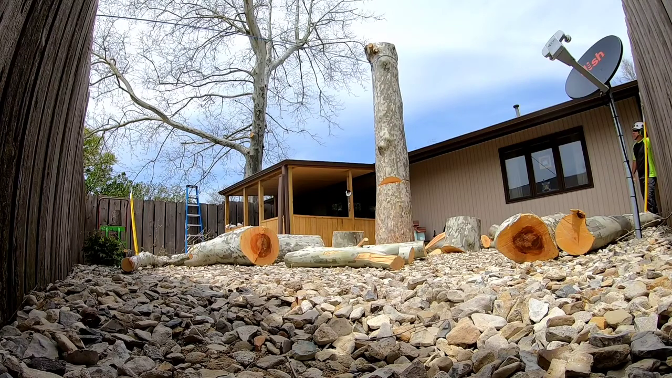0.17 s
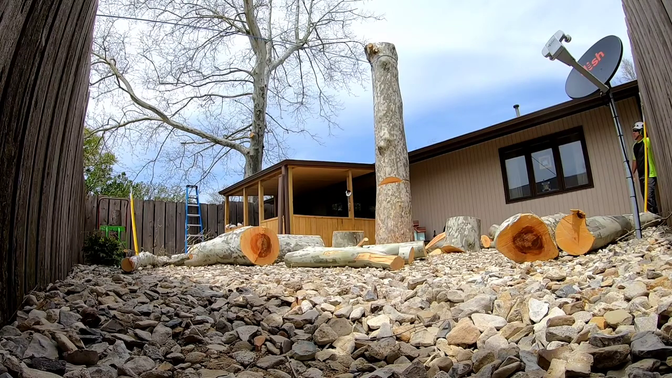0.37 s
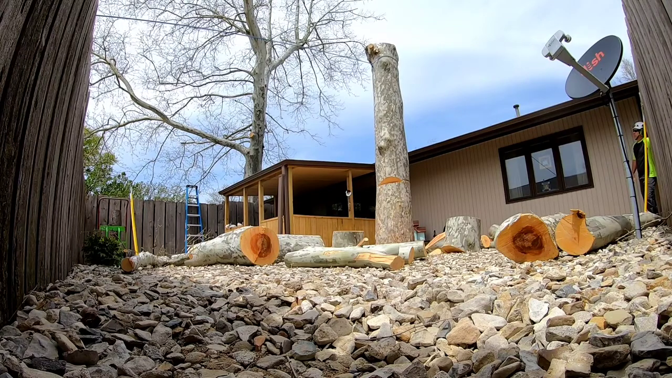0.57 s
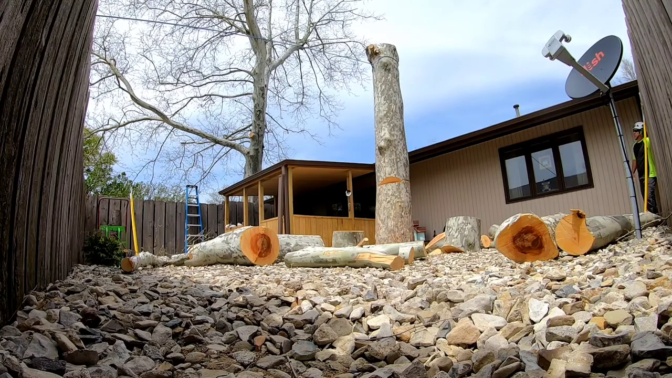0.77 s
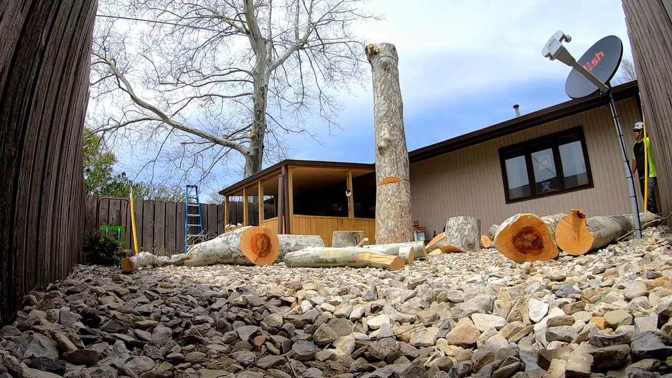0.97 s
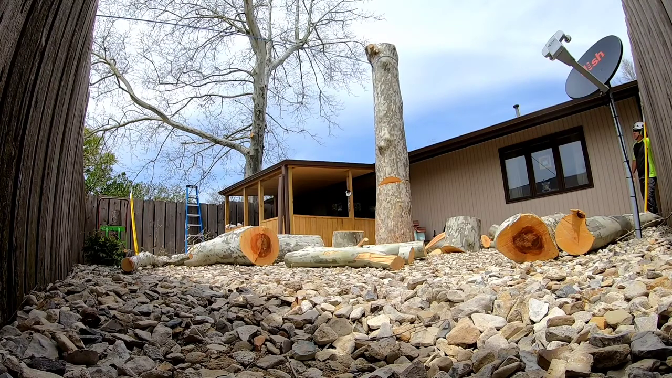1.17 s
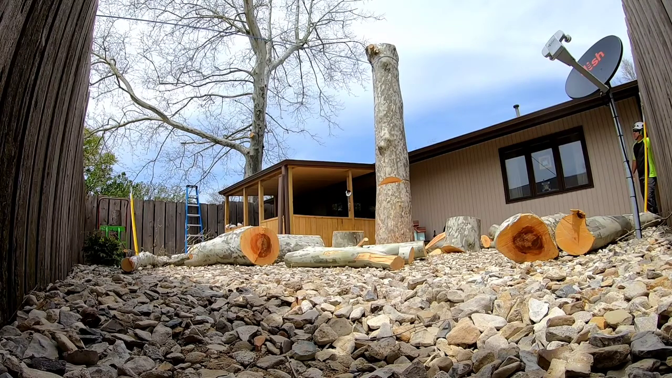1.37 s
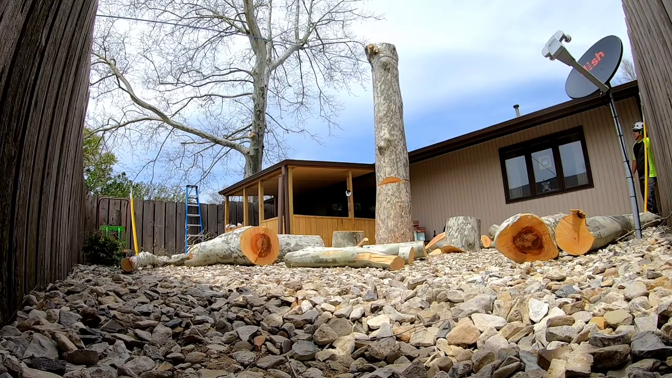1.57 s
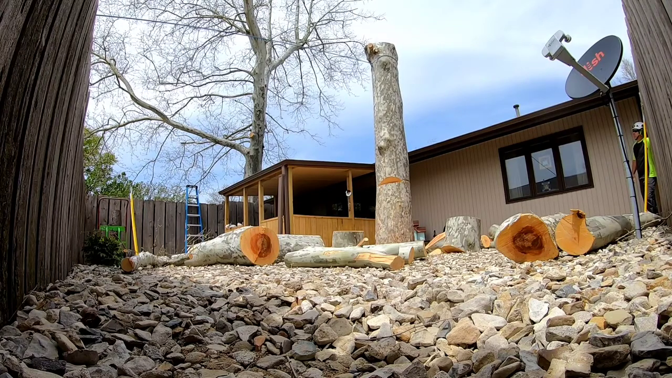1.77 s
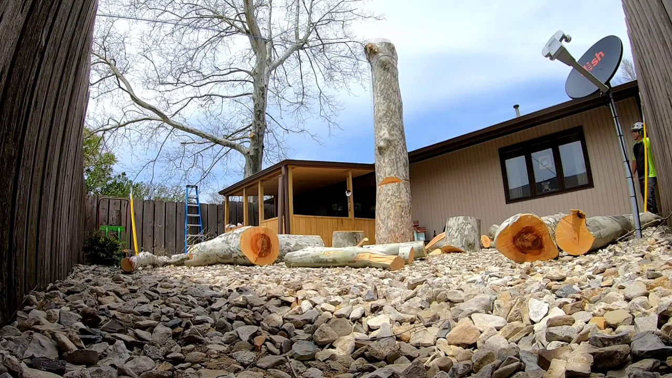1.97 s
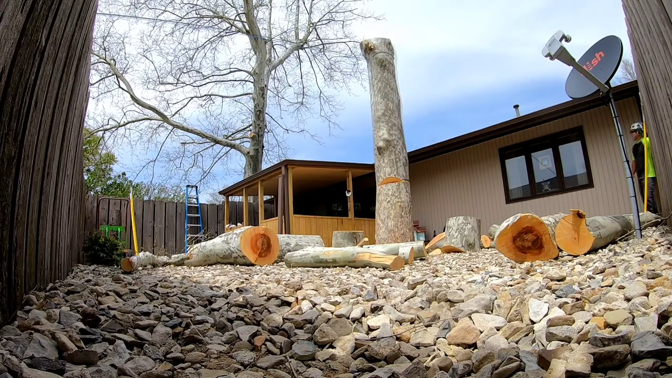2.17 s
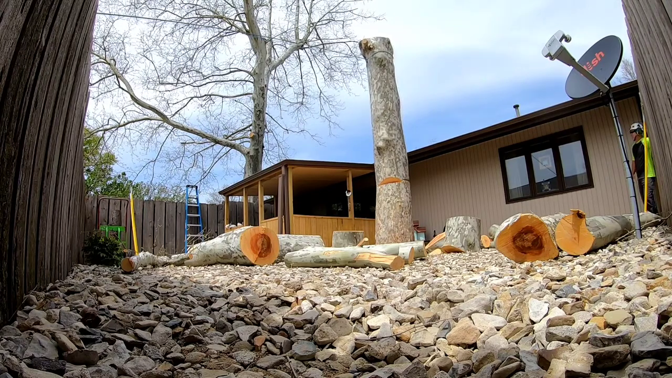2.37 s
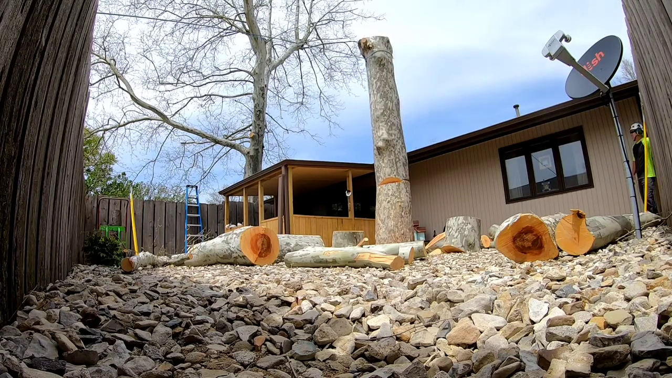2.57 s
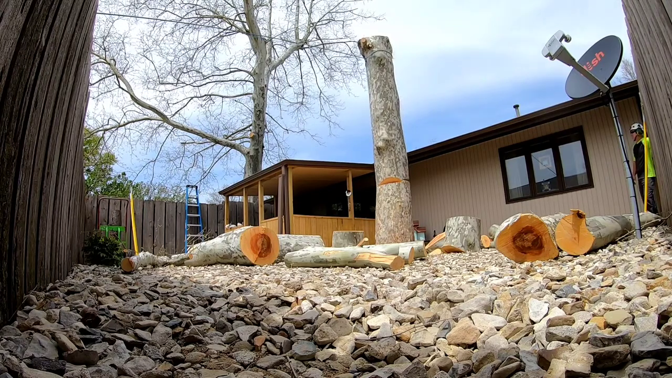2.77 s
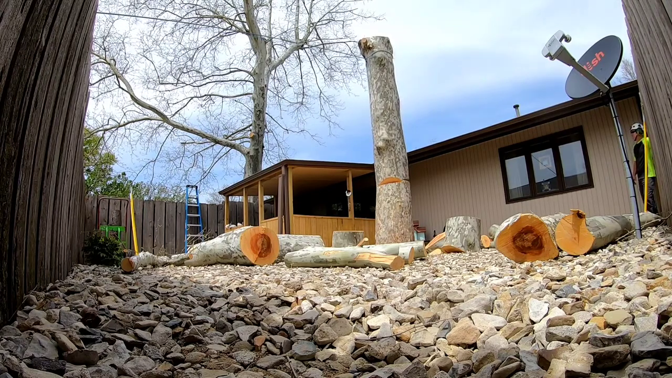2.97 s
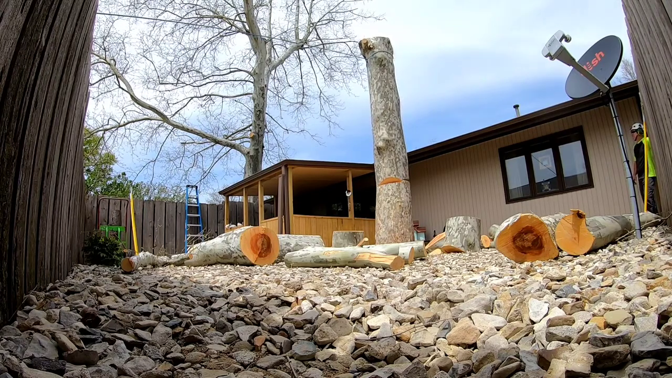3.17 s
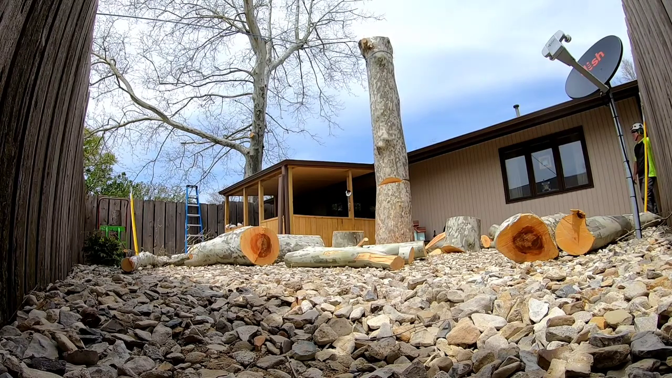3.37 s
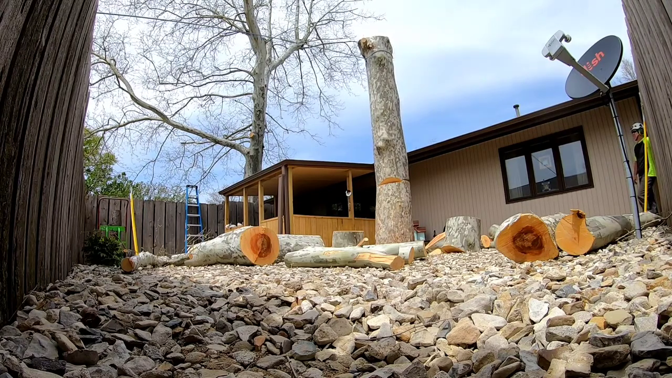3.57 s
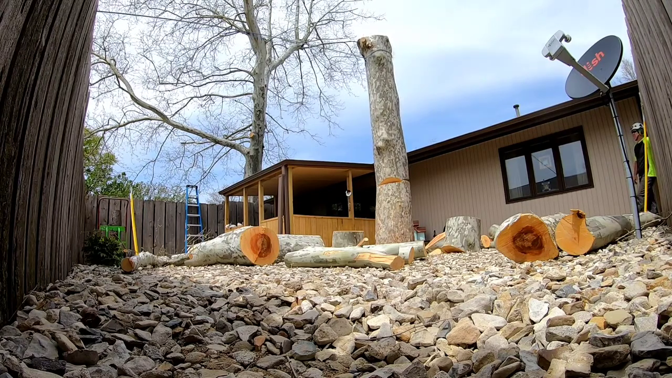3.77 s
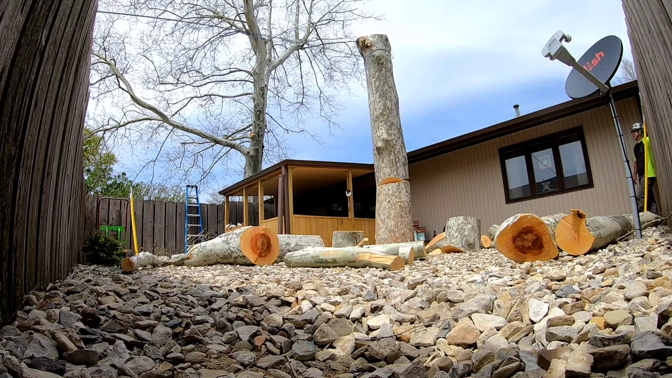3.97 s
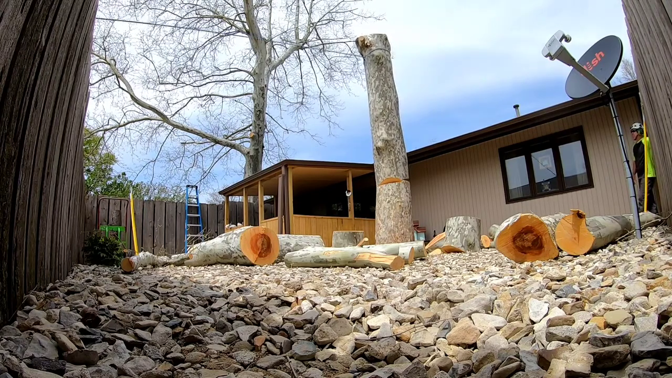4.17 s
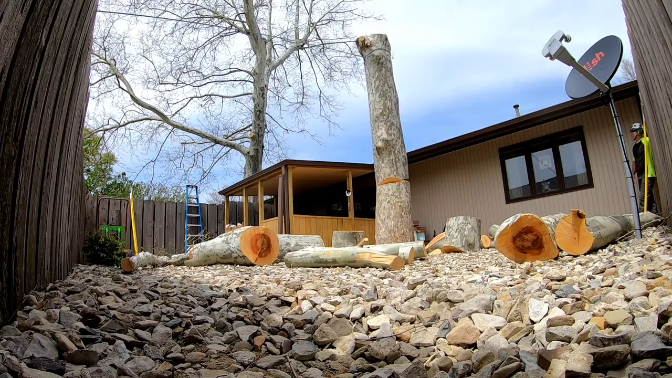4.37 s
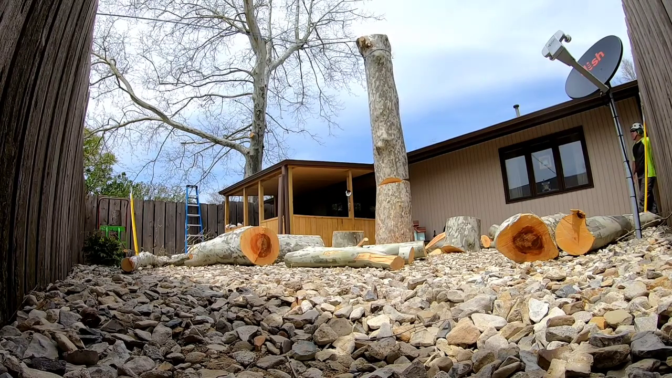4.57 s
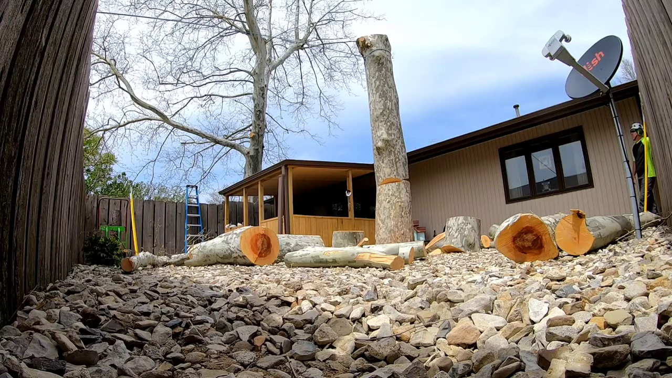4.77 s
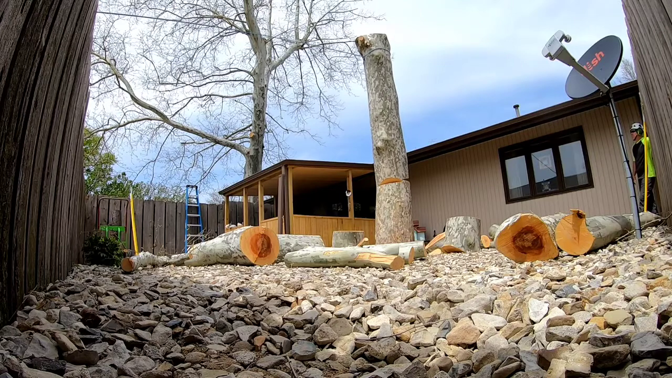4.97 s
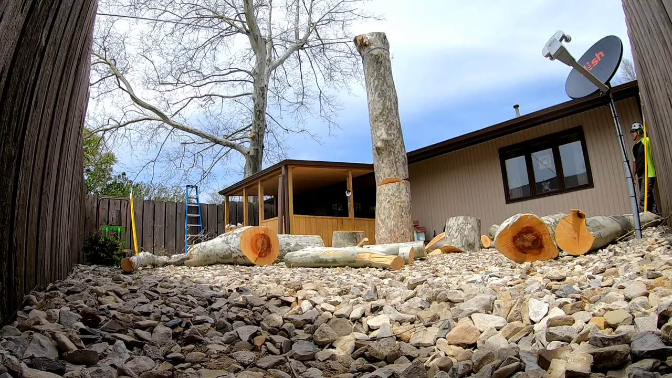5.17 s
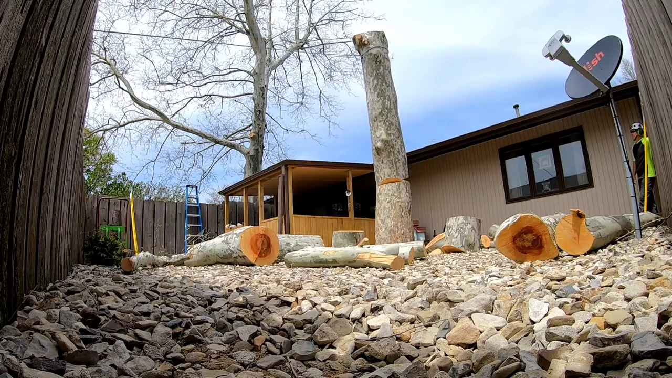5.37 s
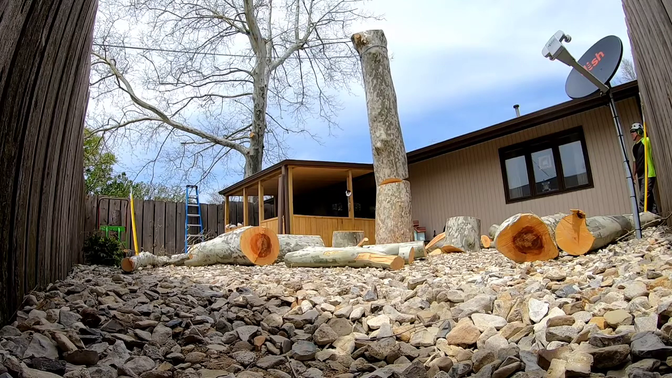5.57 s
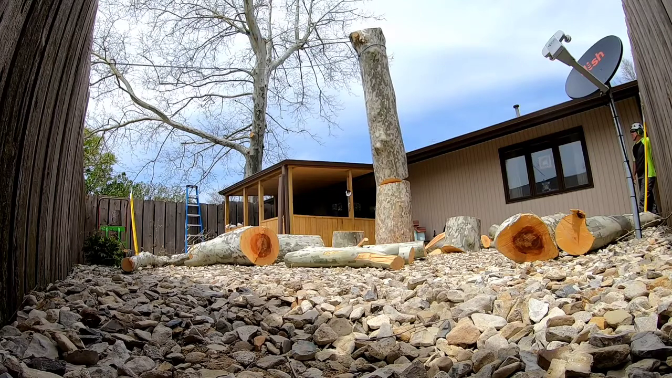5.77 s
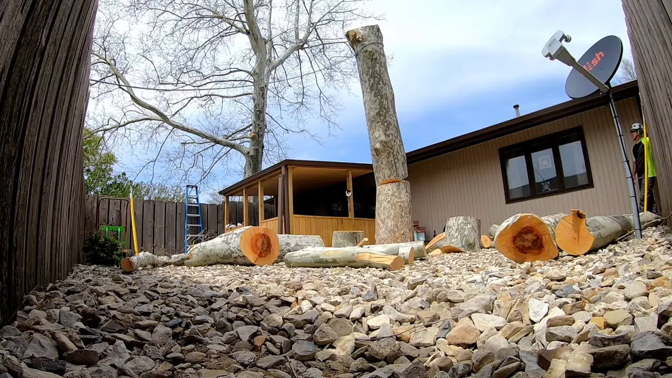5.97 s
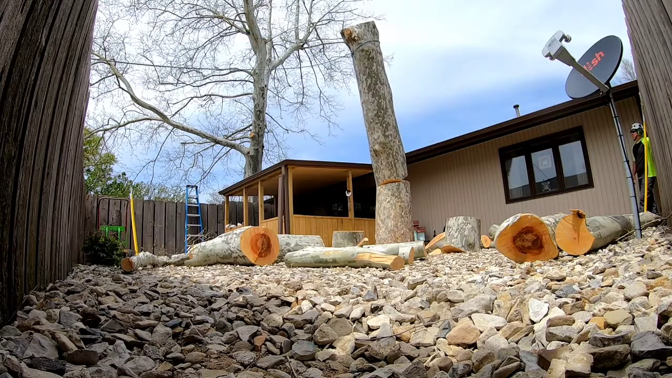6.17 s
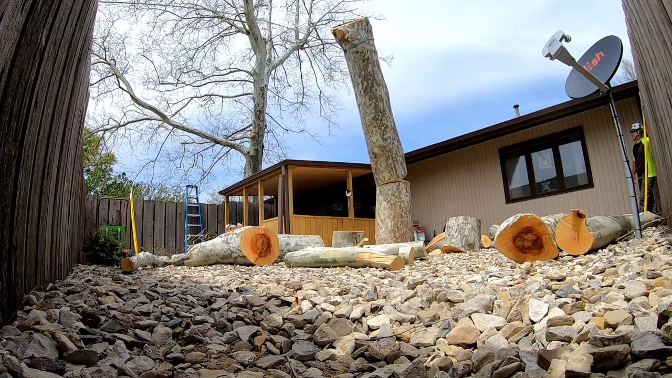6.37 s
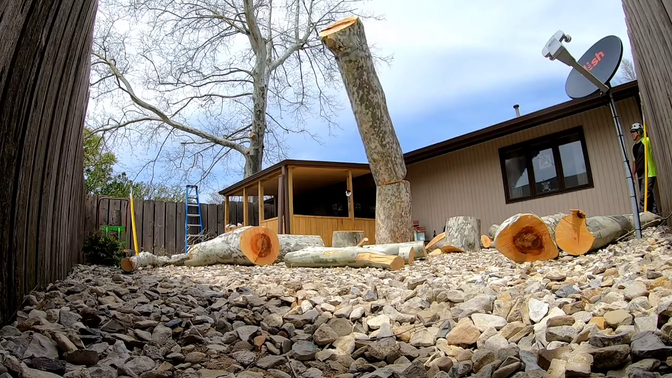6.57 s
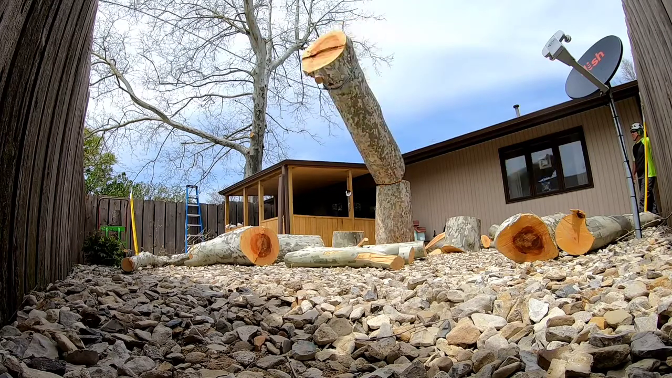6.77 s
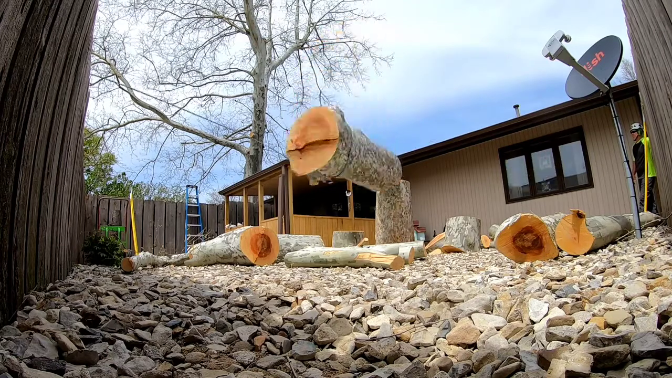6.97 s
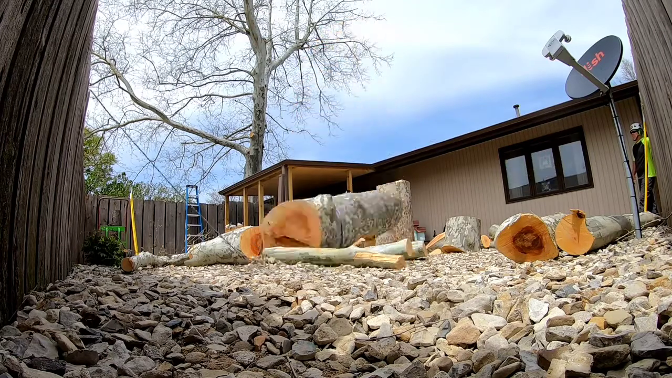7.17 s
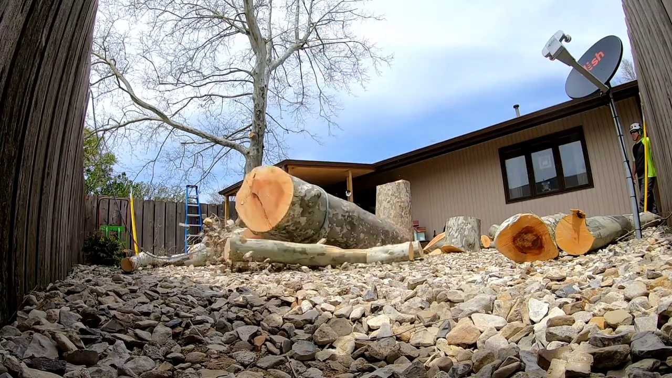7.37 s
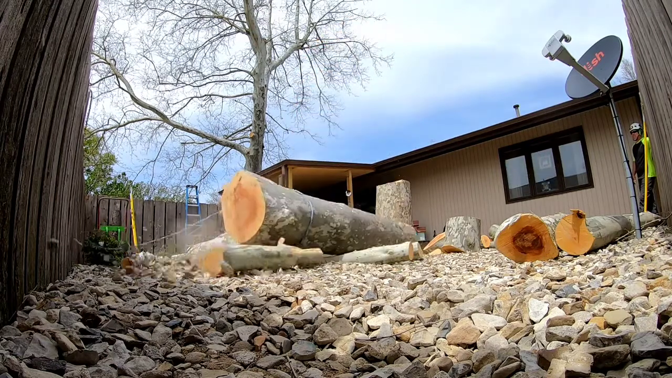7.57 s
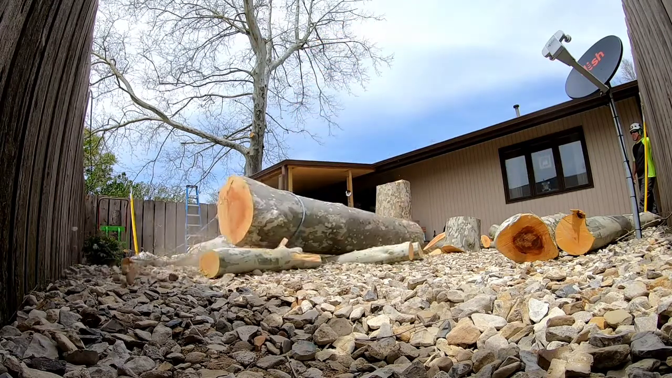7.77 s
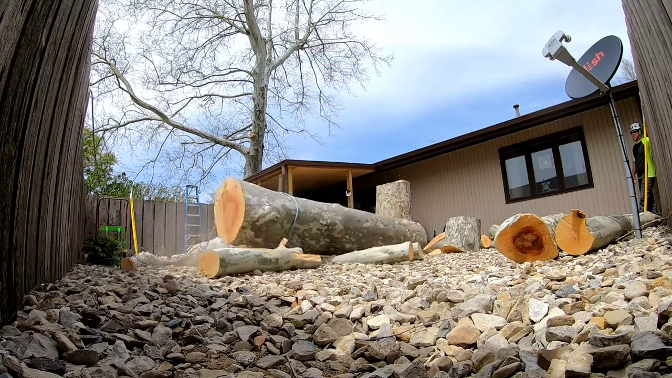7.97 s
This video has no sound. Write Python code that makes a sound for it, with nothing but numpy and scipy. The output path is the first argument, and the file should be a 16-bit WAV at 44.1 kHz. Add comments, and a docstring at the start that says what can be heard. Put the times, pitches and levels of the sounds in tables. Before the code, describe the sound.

A gravel yard between a house and a wooden fence, heard in stereo from near the ground. At first a car's tyre roar fades into low town rumble, with wind buffeting the microphone that slowly freshens; tiny ticks come at 0.9 s and a faint harsh bird repeats notes from 1.2 to 1.9 s. Around 2.45 s wood bursts into sharp snaps and dense tearing crackle until 3 s. After a lull, a second burst runs from 3.7 to 4.3 s. A thin, very faint bird whistle falls at 4.9 s; a third, more scattered and brighter burst covers 5.05-6 s. A low woody groan swells near 6.15 s, with rips at 6.5 and 6.7 s and a hollow thump. At 7.2 s the trunk lands in booming, ringing thuds with a gravel crunch; stones patter and chink, another knock hits at 7.7 s, and loose logs clatter until 8 s. Echoes are short.

```python
"""A gravel yard, heard low by a wooden fence: a tall notched tree trunk is pulled over.
Hinge fibres crack in three main bursts (filtered slip pulses) and tear through (dense random crackle).
The trunk lands with ringing bending modes and a thud, sprays gravel and knocks loose logs about.
House and fence echo it through a decaying noise tail. Shaped noise makes a car fading away, the breeze
and a bird's notes; a swept sine makes one bird whistle; low grainy surges sound like wind gusts."""
import sys
import numpy as np
from scipy import signal
from scipy.fft import rfft, irfft, next_fast_len
from scipy.io import wavfile

SR = 44100
rng = np.random.default_rng(int(sys.argv[2]) if len(sys.argv) > 2 else 0)


def put_to_file(sound):
    """Save the sound as 16-bit audio at rate SR, in the file named by the first command-line argument."""
    columns = np.atleast_2d(sound).T  # one column per channel
    safe = np.clip(columns, -1, 1)
    whole_steps = np.round(safe * 32767)
    wavfile.write(sys.argv[1], SR, whole_steps.astype(np.int16))


N = 353108
TIME = np.arange(N) / SR  # s

# Loudest fibres snapping. Each row: start in seconds, relative level in dB, body gain at 1500 Hz in dB.
FIBRE_SNAPS = [(0.8747, -54.5, 4), (0.926, -57, -8), (2.25, -48.5, -20), (2.443, -34, -18),
               (2.4602, -24, -8), (2.4664, -26.5, -17), (2.5339, -25, 1), (2.5458, -25, -20),
               (2.572, -20, 3.5), (2.584, -30.5, 8), (2.6025, -22.5, 0), (2.6139, -23.5, 0),
               (2.635, -21.5, -13), (2.6933, -24.5, -16), (2.7501, -26.5, 6), (2.7577, -24, 1.5),
               (2.8194, -25, 2), (2.831, -28, 2), (2.8578, -30, 2), (2.8997, -27, -17), (2.941, -35.5, -18),
               (2.9736, -24.5, 0), (2.9862, -32.5, 1), (3.1517, -51.5, -10), (3.195, -51, -10),
               (3.238, -57, -12), (3.3067, -53, -5), (3.55, -50, 7), (3.7083, -28.5, 1), (3.7765, -45, 2),
               (3.8163, -39, -8), (3.839, -31, -12), (3.8858, -32, -6), (3.899, -21, 0),
               (3.9476, -26.5, -9), (3.965, -25, 4), (4.004, -19.5, -8), (4.0208, -22, -16),
               (4.0493, -22.5, -6), (4.18, -26.5, 8), (4.2192, -24.5, 7), (4.2305, -24.5, -8),
               (4.27, -31, -18), (4.2994, -27.5, 3.5), (4.5722, -52, -5), (4.7991, -43.5, -13),
               (5.0531, -31.5, -11), (5.1053, -33, -2), (5.1755, -24, -13), (5.1893, -27.5, -12),
               (5.308, -23.5, 2), (5.3202, -32.5, 21), (5.3542, -30, 4), (5.4264, -25, -5),
               (5.5194, -28.5, -3.5), (5.565, -28, 6.5), (5.6922, -30, -11), (5.7546, -27, -3),
               (5.9929, -32.5, 1), (6.0764, -43, -8), (6.4503, -43.5, -12), (6.4857, -30.5, -12),
               (6.706, -24, -8), (6.9702, -43, -20), (7.0715, -48.5, -18), (7.2016, -24.5, 6)]
# Colour of splitting wood. Each row: frequency in Hz, gain in dB.
SPLIT_SPECTRUM = [(200, -3), (700, -15), (1000, -19.5), (1350, 3), (1750, -9.5), (2300, 5), (3050, -6),
                  (3650, 7), (4200, -3.5), (4800, 4.5), (6300, -2.5), (7800, -13), (9300, 0.5),
                  (12000, -28.5), (15500, -29.5)]
# Colour of tearing fibres. Each row: frequency in Hz, gain in dB.
TEAR_SPECTRUM = [(350, -5), (600, -40.5), (890, -7), (1170, -15.5), (1340, -2), (1600, -8.5), (1990, -3.5),
                 (2250, -4.5), (3200, -3.5), (4810, 1.5), (7740, -11), (9240, -11), (14500, -36),
                 (15500, -43.5)]


def undb(db):
    """Decibels to amplitude gain."""
    return 10 ** (np.asarray(db) / 20)


def unit(x):
    """Scale to rms 1."""
    return x / np.sqrt(np.mean(x ** 2))


def at_hz(points, f):
    """Interpolate (Hz, value) points on a log-frequency axis."""
    hz, value = np.transpose(points)
    return np.interp(np.log(f + 1), np.log(hz), value)


def fade(t, t60_s):
    """Exponential free decay, 60 dB in t60_s."""
    return np.exp(-np.log(1000) * t / t60_s)


def since(start_s):
    """Seconds gone by since start_s, zero before."""
    return np.maximum(TIME - start_s, 0)


def wander(points_per_s):
    """Line through 400 random normal points; stays at the last one once they run out."""
    return np.interp(TIME * points_per_s, np.arange(400), rng.standard_normal(400))


def add(out, start_s, x):
    """Mix x into out from start_s on."""
    i = int(start_s * SR)
    out[..., i:i + x.shape[-1]] += x[..., :N - i]


def colour(x, *spectra):
    """Causal minimum-phase filter whose gain is the sum of the (Hz, dB) spectra."""
    n = 2 * next_fast_len(x.shape[-1] // 2 + 1024)
    f = np.arange(n // 2 + 1) * SR / n
    gain_db = sum(at_hz(points, f) for points in spectra)
    # folding the cepstrum gives the minimum phase
    cepstrum = irfft(np.log(undb(gain_db)))
    cepstrum[1:n // 2] *= 2
    cepstrum[n // 2 + 1:] = 0
    response = np.exp(rfft(cepstrum))
    return irfft(rfft(x, n) * response)[..., :x.shape[-1]]


def spread(pair):
    """Turn two unrelated signals into left and right, alike in the bass."""
    # Each row: frequency in Hz, likeness of left and right from 0 to 1.
    likeness = [(25, 1), (80, 1), (280, 1), (600, 0.75), (1200, 0.48), (2500, 0.9), (4500, 0.75),
                (7000, 0.05)]
    n = 2 * next_fast_len(pair.shape[-1] // 2 + 1)
    mid, side = rfft(pair, n)
    alike = np.clip(at_hz(likeness, np.arange(len(mid)) * SR / n), 0, 1)
    mid = mid * np.sqrt((1 + alike) / 2)
    side = side * np.sqrt((1 - alike) / 2)
    return irfft(np.array([mid + side, mid - side]))[:, :pair.shape[-1]]


def noise(n):
    """Scattered stereo noise."""
    return spread(rng.standard_normal((2, n)))


def clicks(per_s, scatter_db):
    """Random clicks of unequal size and either sign, rms 1."""
    out, count = np.zeros(N), int(per_s * N / SR)
    when, rarity, sign = rng.random((40000, 3))[:count].T
    size = undb(-scatter_db * np.log(np.maximum(rarity, .02)))
    out[(when * N).astype(int)] = np.sign(sign - .5) * size
    return unit(out)


def fibre(gap_s=.00075, recoil=0.76, variety_db=4.5, slip_count=5):
    """A fibre lets go in slips about a millisecond or less apart, splinters rattling after; colour varies."""
    grain_db, grain_t60_s = -13, .009
    splinter_db, splinter_t60_s = -22, .04
    t = TIME[:2048]
    decay = undb(grain_db) * fade(t, grain_t60_s) + undb(splinter_db) * fade(t, splinter_t60_s)
    burst = noise(len(t)) * decay
    slips_s = np.cumsum(gap_s * rng.uniform(.7, 1.3, slip_count)) * rng.uniform(.7, 1.3)
    slip_samples = ((slips_s - slips_s[0]) * SR).astype(int)
    # the second slip is the strongest
    burst[:, slip_samples] += recoil ** np.abs(np.arange(slip_count) - 1)
    variety = list(zip(np.geomspace(1000, 12000, 18), variety_db * rng.standard_normal(18)))
    return colour(burst, variety)


def snaps(gain_db=24):
    """Loud cracks: louder ones come from thicker fibres and are duller; late, thin ones are brighter."""
    ordinary_db, edge_db, edge_db_per_db = -26.5, -4.5, -0.2  # edge: gain at 9500 Hz
    thin_from_s, thin_edge_db = 4.7, 4.5  # only thin fibres are left in the hinge
    sparkle_db = 4  # the very top of the whole crack is lifted above the edge
    out = np.zeros((2, N))
    for start_s, db, body_db in FIBRE_SNAPS:
        edge = edge_db + edge_db_per_db * (db - ordinary_db) + thin_edge_db * (start_s > thin_from_s)
        tone = [(1500, body_db), (2600, 0.0042), (6000, 0.0062), (9500, edge), (12500, edge + sparkle_db)]
        crack = colour(fibre(), SPLIT_SPECTRUM, tone)
        crack_norm = np.sqrt(np.sum(crack ** 2) / 2)
        add(out, start_s, undb(db + gain_db) * crack / crack_norm)
    return out


def strain():
    """Hinge strain: each spell builds up, sags while the fibres give way, then relaxes."""
    # Each row: time of full strain in seconds, relative level in dB, build-up in seconds,
    # hold in seconds, sag in dB per second.
    spells = [(2.608, -23, 0.13, 0.24, 33), (4.037, -27, 0.18, 0.29, 20), (5.192, -34.5, .08, 0.44, 11),
              (5.803, -43, .3, 1, 0.5), (7.183, -37, 0.28, .02, 20)]
    build_db, relax_db_per_s = 26, 194
    total = 0
    for full_s, db, build_s, hold_s, sag_db_per_s in spells:
        early = np.maximum(full_s - TIME, 0) / build_s
        sag_db = sag_db_per_s * since(full_s)
        relax_db = relax_db_per_s * since(full_s + hold_s)
        total = total + undb(db - build_db * early - sag_db - relax_db)
    return total


def crackle(per_s, scatter_db, count):
    """Several kinds of fibre, each parting at random per_s times a second."""
    def one_kind():
        return signal.oaconvolve(clicks(per_s, scatter_db)[None], unit(fibre()), axes=1)[:, :N]
    return sum(one_kind() for _ in range(count))


def tearing(fine_db=-8.0, rip_db=-0.5, thick_db=-37, full_strain_db=-25, thick_power=0.8):
    """Fine and thick fibres part with the hinge strain; fine ones also rush when a bundle rips."""
    # Bundles ripping. Each row: start in seconds, relative level in dB, seconds to the peak.
    rips = [(2.452, -29, 0.0036), (2.568, -35.5, 0.0081), (3.9, -30.5, 0.049), (3.991, -26, 0.0043),
            (4.164, -24.5, 0.0092), (5.176, -31, 0.0032), (5.309, -30, 0.0062), (6.483, -23, 0.0036),
            (6.727, -20.5, 0.01)]
    load, t = strain(), TIME[:SR // 4]
    rush = undb(fine_db) * load
    for start_s, db, peak_s in rips:
        add(rush, start_s, undb(db + rip_db) * t / peak_s * np.exp(1 - t / peak_s))
    fine = unit(colour(crackle(per_s=40, scatter_db=4.0, count=24), TEAR_SPECTRUM))
    thick = unit(colour(crackle(per_s=9, scatter_db=0.5, count=8), SPLIT_SPECTRUM))
    thick_rush = undb(thick_db) * (load / undb(full_strain_db)) ** thick_power
    return fine * rush + thick * thick_rush


def groan(per_s=160, scatter_db=3.0):
    """The bending hinge sticks and slips unevenly, exciting the stump's low resonance; it swells and dies."""
    centre_s, width_s, level_db = 6.15, 0.53, -52.5
    stump = [(200, -22), (320, -3), (390, -6), (470, -9.5), (570, -9.5), (750, -17.5), (1500, -22), (4000, -57)]
    swell = np.exp(-((TIME - centre_s) / width_s) ** 2)
    return unit(colour(clicks(per_s, scatter_db), stump)) * undb(level_db) * swell


def trunk(thud_t60_s=0.13, contact_s=.0028):
    """Each blow rings the lowest bending mode and short higher modes; the ground adds a dull thud."""
    # Each row: start in seconds, ring level in dB, lowest mode in Hz, ring t60 in seconds, hard knock in dB.
    blows = [(3.996, -25, 143, 0.053, -27.5), (6.712, -27, 141.3, 0.32, -37), (6.738, -11, 144.4, 0.2, -22),
             (6.774, -21.5, 137.9, 0.76, -37), (7.2, -8.5, 133.4, 0.35, -9), (7.243, -27, 139, .2, -10),
             (7.277, -8.5, 125.4, 0.51, -23), (7.366, -11.5, 122, 0.27, -36), (7.398, -19, 107, 0.2, -17.5),
             (7.432, -24, 129, 0.14, -32.5), (7.725, -10, 155.7, 0.098, -23.5)]
    # Higher modes. Each row: multiple of the lowest mode, level in dB re knock, t60 in seconds.
    higher_modes = [(1.29, -1.5, 0.058), (1.52, 3, 0.093), (1.85, 0, 0.081), (2.1, 3.5, 0.078),
                    (2.4, -2.5, 0.068), (2.9, -7.5, 0.057)]
    # Each row: frequency in Hz, gain in dB.
    thud_spectrum = [(25, -12), (60, 5), (110, -8), (200, -2.5), (290, -14), (400, -10), (620, -24),
                     (1500, -22.5), (4000, -75.5)]
    thud_db, thud_db_per_db = -5.5, 0.52  # the thud grows with the hardness of the knock
    out, t = np.zeros((2, N)), TIME[:SR]
    push = 1 - np.exp(-t / contact_s)
    for start_s, ring_db, hz, t60_s, knock_db in blows:
        ring = np.sin(2 * np.pi * hz * t) * fade(t, t60_s)
        knock = 0
        for multiple, db, short_s in higher_modes:
            mode = np.sin(2 * np.pi * (hz * multiple * t + rng.random()))
            knock = knock + undb(db) * mode * fade(t, short_s)
        thud = unit(colour(noise(len(t)), thud_spectrum)) * fade(t, thud_t60_s)
        thud_gain = undb(thud_db + thud_db_per_db * knock_db)
        add(out, start_s, push * (undb(ring_db) * ring + undb(knock_db) * knock + thud_gain * thud))
    return out


def logs(peak_db=5, width=1.8, rise_s=0.00062, order=7, ring_db=-6):
    """Loose rough logs knock: a scrape and short modes around each piece's brightest pitch."""
    # Each row: start in seconds, level in dB, brightest pitch in Hz, t60 in seconds, hollow body in dB.
    knocks = [(7.368, -23.5, 1340, 0.042, -11.5), (7.7237, -10.5, 1505, 0.052, -0.5),
              (7.812, -15, 1970, 0.041, 5), (7.832, -18.5, 2054, 0.16, 4.5),
              (7.845, -10, 2260, 0.019, -14.5), (7.879, -27, 749, 0.3, 3), (7.929, -18.5, 1160, 0.068, 3),
              (7.939, -18.5, 961, .12, 2)]
    # Each row: frequency in Hz, gain in dB.
    log_spectrum = [(30, -32), (80, -16), (160, 2), (350, -2), (560, -4), (850, -4), (1500, -9),
                    (2300, -10.5), (4000, -28), (9000, -33.5), (15000, -54)]
    out, t = np.zeros((2, N)), TIME[:SR // 3]
    for start_s, db, hz, t60_s, body_db in knocks:
        resonance = [(hz / width, body_db), (hz, peak_db), (hz * width, 0)]
        scrape = unit(colour(noise(len(t)), log_spectrum, resonance))
        modes_hz = hz * np.geomspace(.4, 1.1, order) * rng.uniform(.94, 1.06, order)
        ring = unit(undb(at_hz(resonance, modes_hz)) @ np.sin(2 * np.pi * np.outer(modes_hz, t)))
        knock = unit(scrape + undb(ring_db) * ring)
        add(out, start_s, undb(db) * knock * (1 - np.exp(-t / rise_s)) * fade(t, t60_s))
    return out


def chink(hz, t60_s, upper=1.12, upper_db=-6):
    """A stone rings briefly in two close modes, swelling over the first cycles of the contact."""
    t = TIME[:2048]
    modes = np.sin(2 * np.pi * hz * t) + undb(upper_db) * np.sin(2 * np.pi * hz * upper * t)
    return modes * (1 - np.exp(-hz * t / 2)) * fade(t, t60_s)


def gravel(patter_db=-3, small_db=-4, loud_db=3, loud_t60_s=0.024, pebble_t60_s=.02, count=1100):
    """The landing crunches gravel and throws a thinning shower: grit, ringing pebbles and loud chinks."""
    # Each row: frequency in Hz, gain in dB.
    stone_spectrum = [(350, 5), (600, -14), (746, -10.5), (1320, -9), (1620, -9), (2610, -8.5),
                      (2910, -5.5), (3820, -6.5), (5440, -3.5), (7540, -15.5), (9630, -10.5),
                      (11500, -25.5), (14100, -32), (15500, -83)]
    # Loudest stones landing. Each row: start in seconds, relative level in dB, pitch in Hz.
    loud_stones = [(7.4776, -21, 5570), (7.5062, -33, 4950), (7.5358, -18, 5320), (7.607, -17.5, 4970),
                   (7.6663, -17.5, 5380), (7.8953, -25, 3310), (7.9358, -22.5, 3270)]
    landing_s, crunch_db, crunch_t60_s = 7.2, -14, 0.052
    shower_db, shower_rise_s, shower_t60_s = -22, 0.017, 4.1
    grit = spread(np.array([clicks(per_s=2500, scatter_db=3) for _ in range(2)]))
    grit = unit(colour(grit, stone_spectrum))

    pebbles, loud = np.zeros((2, N)), np.zeros((2, N))
    for when, pitch, size, side in rng.random((count, 4)):
        hz = np.interp(pitch, [0, .4, .93, 1], [2495, 4460, 5910, 8870])
        ring = chink(hz, pebble_t60_s) * undb(16.0 * size ** 2)
        add(pebbles, landing_s + when * (TIME[-1] - landing_s), np.outer([side, 1 - side], ring))
    pebbles = colour(pebbles, [(hz, db / 2) for hz, db in stone_spectrum])
    pebbles /= pebbles[:, int(landing_s * SR):].std()

    for start_s, db, hz in loud_stones:
        add(loud, start_s, undb(db + loud_db) * chink(hz, loud_t60_s))

    t = since(landing_s)
    crunch = undb(crunch_db) * (t > 0) * fade(t, crunch_t60_s)
    shower = undb(shower_db) * (1 - np.exp(-t / shower_rise_s)) * fade(t, shower_t60_s)
    # at 60 points per s the wander has run out by the landing: one random level for the whole shower
    shower *= undb(4.5 * wander(60))
    return (undb(patter_db) * grit + undb(small_db) * pebbles) * (crunch + shower) + loud


def low_gusts(rise_s=0.0057):
    """Dull low surges of grainy noise (filtered clicks), like wind gusts on the microphone."""
    # Each row: start in seconds, level in dB, length in seconds.
    gusts = [(3.562, -36, 0.65), (4.854, -33.5, 0.19), (5.003, -33, 0.27), (7.138, -25, 0.18)]
    # Each row: frequency in Hz, gain in dB.
    gust_spectrum = [(60, -5.5), (150, 5.5), (230, 6), (330, -1.5), (480, -18), (900, -18), (1800, -23.5),
                     (3000, -36), (6000, -59)]
    swell, t = np.zeros(N), TIME[:SR]
    for start_s, db, length_s in gusts:
        add(swell, start_s, undb(db) * (1 - np.exp(-t / rise_s)) * np.exp(-(t / length_s) ** 3))
    grains = spread(np.array([clicks(per_s=1800, scatter_db=0.47) for _ in range(2)]))
    return swell * unit(colour(grains, gust_spectrum))


def flanks(gain_db):
    """Cracks radiated away from the listener: pulses with the average colour of the tearing."""
    out = np.zeros((2, N))
    start_s, db = np.transpose(FIBRE_SNAPS)[:2]
    out[:, (start_s * SR).astype(int)] = undb(db + gain_db)
    crack = colour(signal.unit_impulse(2048), TEAR_SPECTRUM)
    return signal.oaconvolve(out, crack[None] / np.linalg.norm(crack), axes=1)[:, :N]


def yard(x, onset_s=0.001, t60_s=0.31, level_db=-3):
    """House, fence and stones scatter the sound back; little of the bass returns in the open."""
    t = TIME[:SR]
    walls = [(120, -14.5), (300, -4.0), (1000, -4), (5500, -1), (12000, 1.0)]
    tail = colour(noise(len(t)) * fade(t, t60_s) * (1 - np.exp(-t / onset_s)), walls)
    tail *= undb(level_db) / np.sqrt(np.sum(tail ** 2) / 2)
    return signal.fftconvolve(x.mean(axis=0)[None], tail, axes=1)[:, :N]


def bird(peak_s=0.027, count=5):
    """A far bird repeats a harsh note of throat-coloured noise, each time softer."""
    first_s, gap_s, first_db, drop_db = 1.207, .154, -48.5, 2.5
    out, t = np.zeros((2, N)), TIME[:SR // 3]
    throat = [(2200, -8), (3000, -1.5), (3900, -4.0), (4800, 1), (5600, -8.5), (6800, -23), (11000, -36)]
    swell = (t / peak_s * np.exp(1 - t / peak_s)) ** 2
    for k in range(count):
        note = unit(colour(noise(len(t)), throat)) * swell
        add(out, first_s + k * gap_s, undb(first_db - k * drop_db) * note)
    return out


def whistle(start_s=4.92, start_hz=10800, glide_to_hz=8300, db=-66):
    """One thin bird whistle: a sine gliding down towards glide_to_hz."""
    out, u = np.zeros(N), np.linspace(0, 1, int(.14 * SR))
    hz = glide_to_hz + (start_hz - glide_to_hz) * np.exp(-3 * u)
    tone = np.sin(2 * np.pi * np.cumsum(hz) / SR)
    add(out, start_s, undb(db) * tone * np.sqrt(4 * u * (1 - u)))
    return out


def car(flutter_db=1.4, flutter_per_s=14):
    """Tyre roar of a car fading into far traffic: road-coloured noise, wavering a little."""
    # Each row: frequency in Hz, gain in dB.
    road_spectrum = [(30, -23.5), (70, -7), (120, -1.5), (200, -1.5), (280, -12.5), (440, -20),
                     (650, -27.5), (850, -25), (1000, -19.5), (1400, -27), (2100, -29.5), (3500, -43),
                     (5600, -47.5), (9000, -77.5)]
    car_db, fade_s, traffic_db = -33.5, 1.556, -50.5
    level = np.hypot(undb(car_db) * np.exp(-(TIME / fade_s) ** 2), undb(traffic_db))
    return unit(colour(noise(N), road_spectrum)) * level * undb(flutter_db * wander(flutter_per_s))


def breeze():
    """Low wind buffeting on the microphone, freshening slowly and gusting."""
    # Each row: frequency in Hz, gain in dB.
    buffet_spectrum = [(12, -10), (25, 2.5), (36, 10), (55, 0.5), (80, 5), (130, -4.5), (300, -59)]
    level_db, rise_db_per_s, gust_db, gusts_per_s = -45, 0.74, 1.7, 4
    # the slowest eddies strike each microphone port on its own
    eddies = colour(rng.standard_normal((2, N)), [(25, -4), (60, -10.5), (130, -20)])
    wind_db = level_db + rise_db_per_s * TIME + gust_db * wander(gusts_per_s)
    return unit(colour(noise(N) + eddies, buffet_spectrum)) * undb(wind_db)


def town(level_db=-43):
    """Steady rumble of the town: low-coloured noise."""
    # Each row: frequency in Hz, gain in dB.
    air_spectrum = [(40, -23), (80, -4), (120, 0.5), (200, -4.5), (380, -24), (700, -51.5), (1100, -34),
                    (2500, -40), (5500, -45), (8000, -61.5), (14000, -78.5)]
    return undb(level_db) * unit(colour(noise(N), air_spectrum))


def scene():
    """All sources in the yard, shaded on the left by the fence."""
    # Each row: frequency in Hz, left minus right in dB.
    shade = [(300, 0), (650, 1.5), (1300, 1.5), (2400, 0), (4400, -4.5), (8000, -9), (13000, 2.5)]
    near = tearing() + groan() + trunk() + logs() + gravel() + low_gusts() + bird() + whistle()
    direct = snaps() + near
    echo = yard(near + flanks(gain_db=26.5))  # the flanks are heard only as echo
    left, right = direct + echo + (car() + breeze() + town())
    left = colour(left, [(hz, db / 2) for hz, db in shade])
    right = colour(right, [(hz, -db / 2) for hz, db in shade])
    return np.array([left, right])


def record(dry, top_hz=15100):
    """The recorder clips at full scale, then low-passes at top_hz."""
    lowpass = signal.ellip(8, .2, 70, top_hz, fs=SR, output="sos")
    return signal.sosfilt(lowpass, np.clip(dry, -1, 1))


dry = scene()
out = record(dry)
put_to_file(out)
```